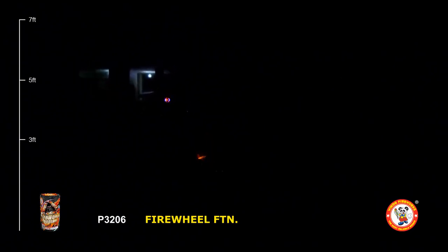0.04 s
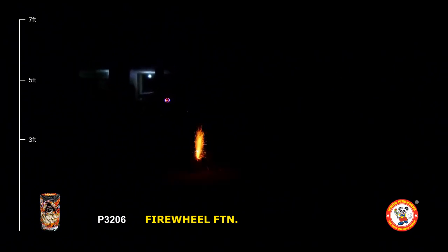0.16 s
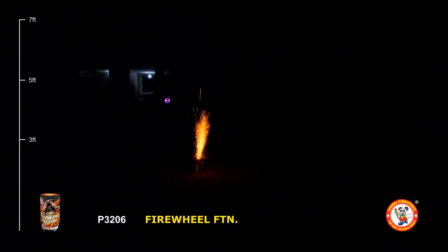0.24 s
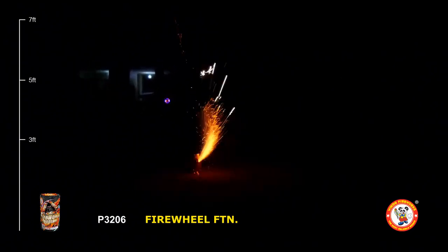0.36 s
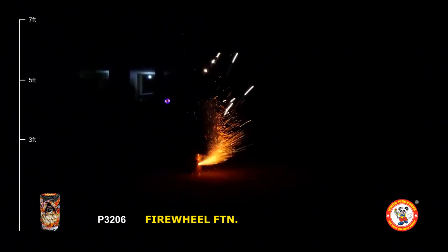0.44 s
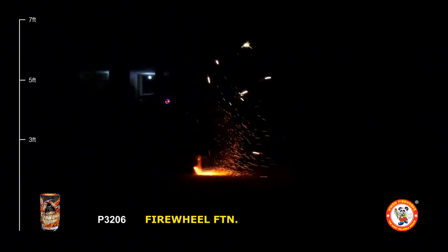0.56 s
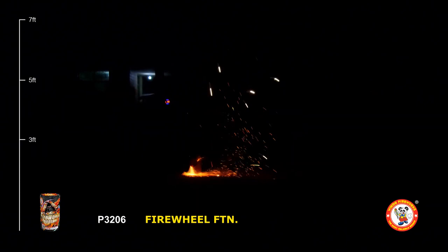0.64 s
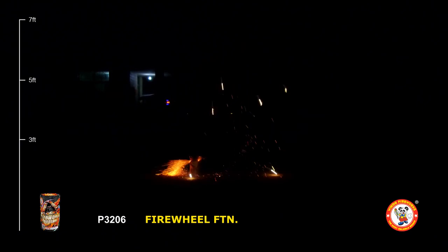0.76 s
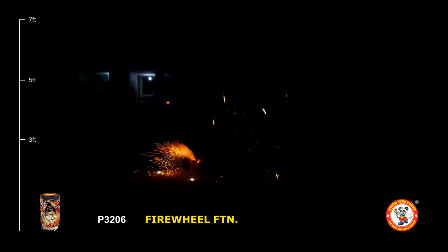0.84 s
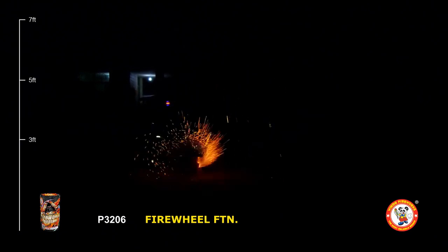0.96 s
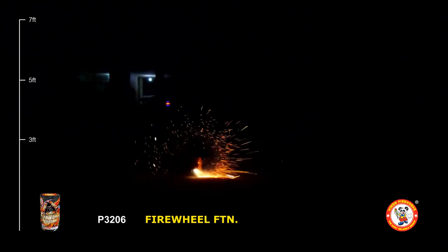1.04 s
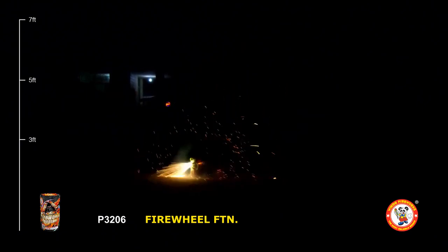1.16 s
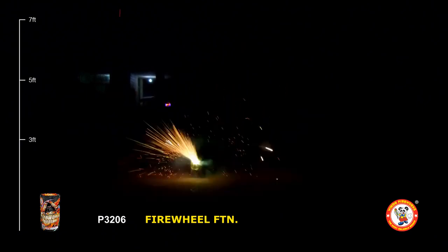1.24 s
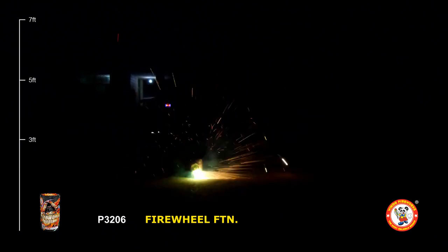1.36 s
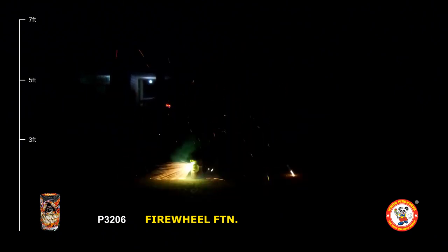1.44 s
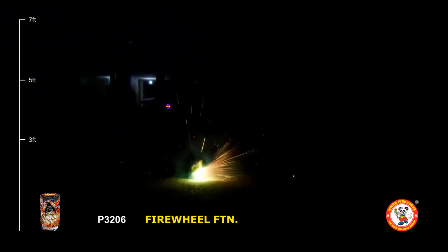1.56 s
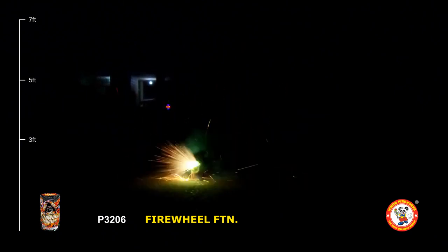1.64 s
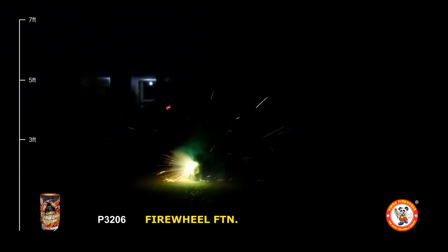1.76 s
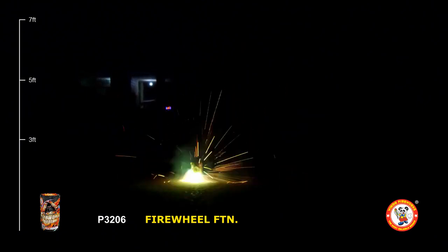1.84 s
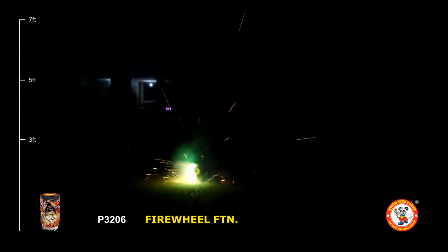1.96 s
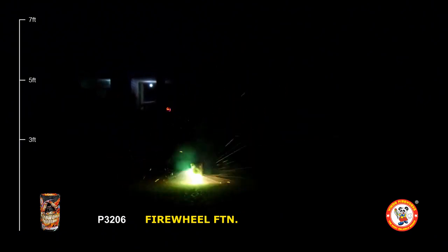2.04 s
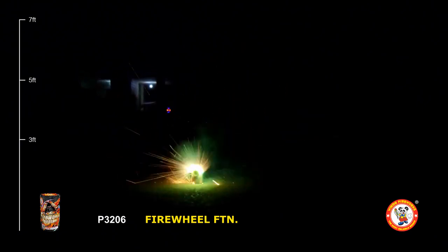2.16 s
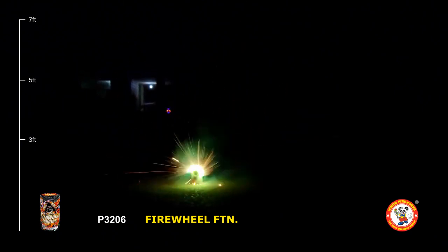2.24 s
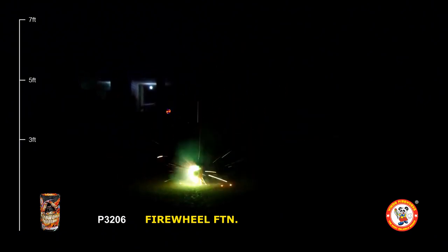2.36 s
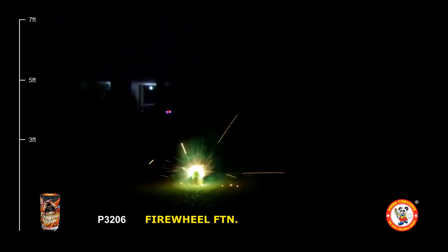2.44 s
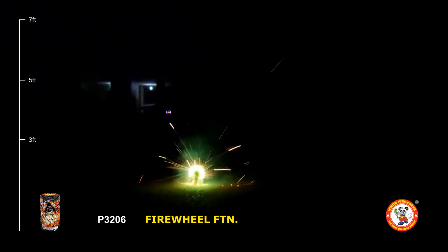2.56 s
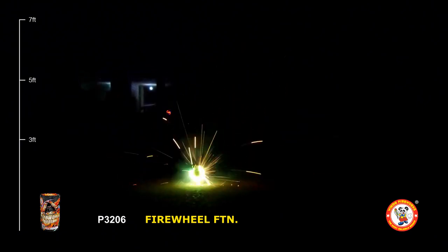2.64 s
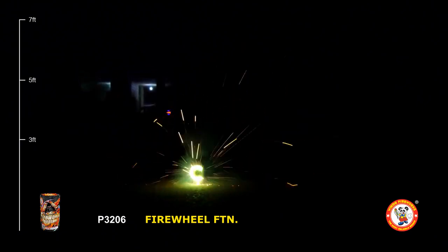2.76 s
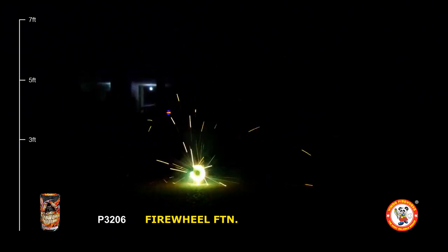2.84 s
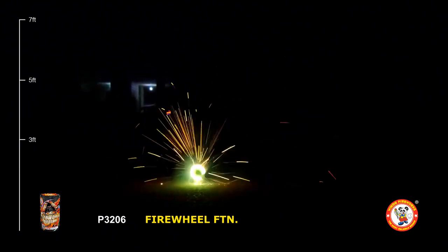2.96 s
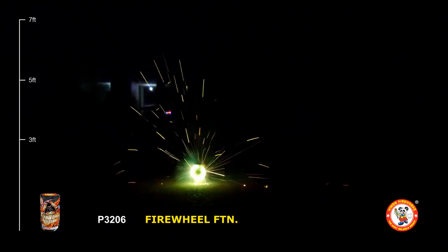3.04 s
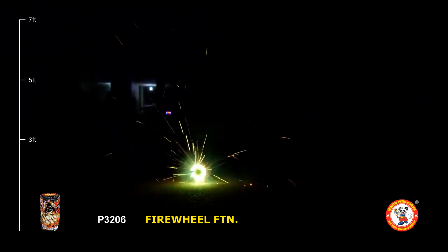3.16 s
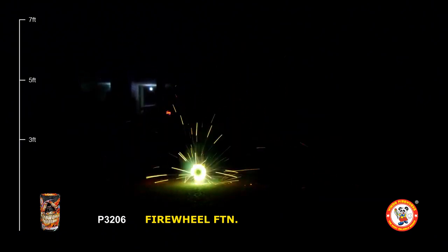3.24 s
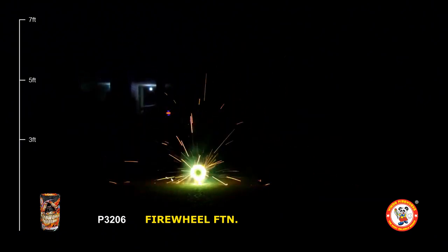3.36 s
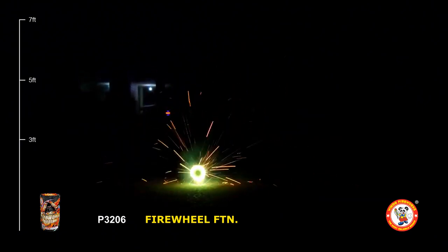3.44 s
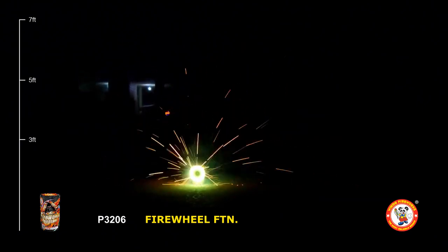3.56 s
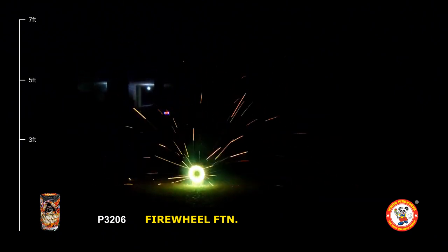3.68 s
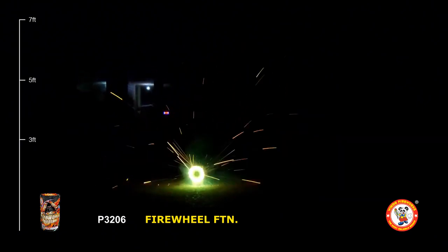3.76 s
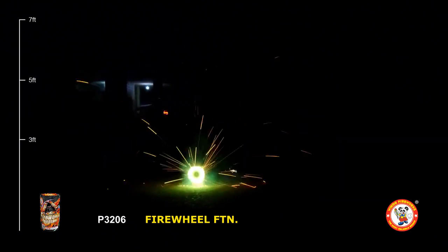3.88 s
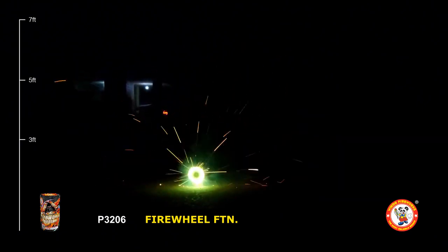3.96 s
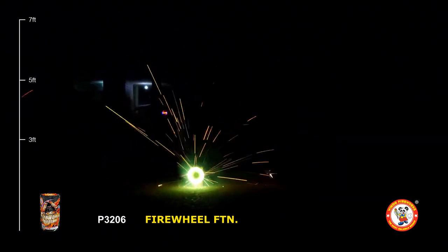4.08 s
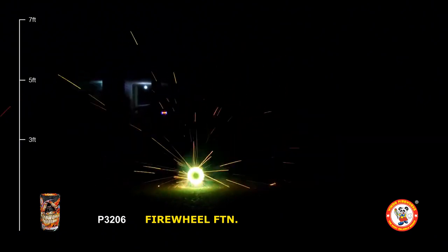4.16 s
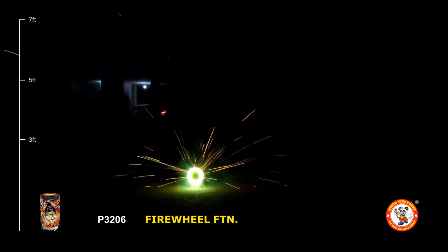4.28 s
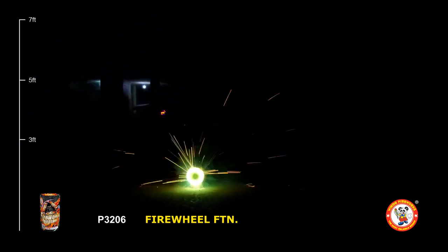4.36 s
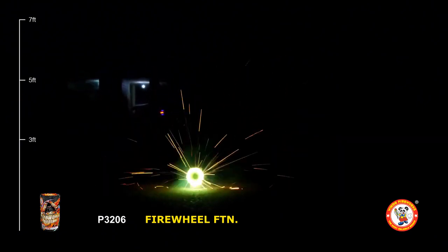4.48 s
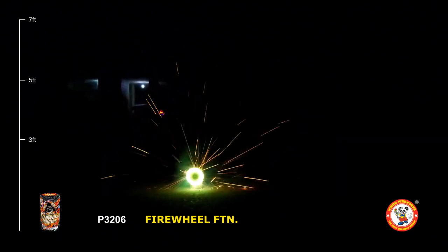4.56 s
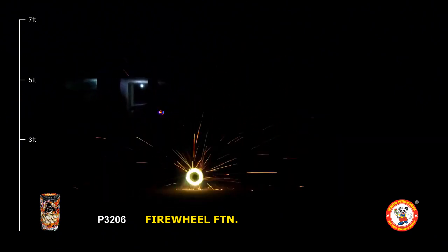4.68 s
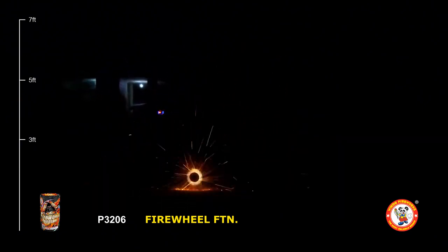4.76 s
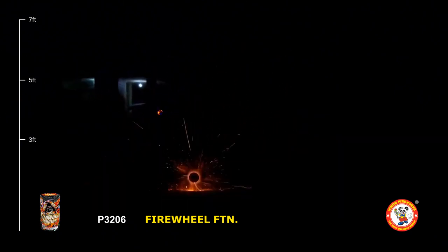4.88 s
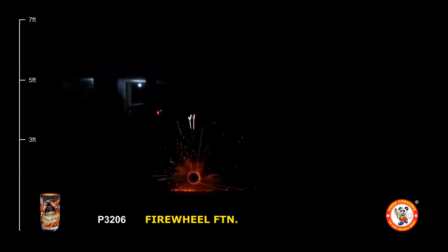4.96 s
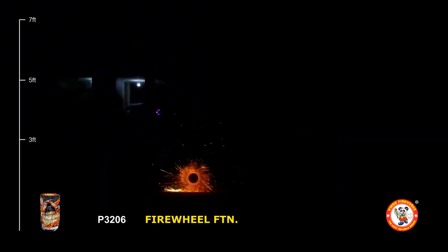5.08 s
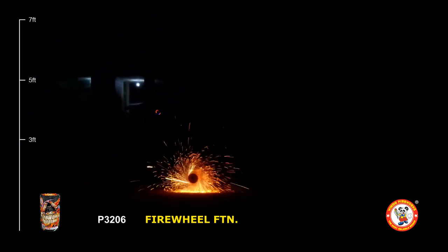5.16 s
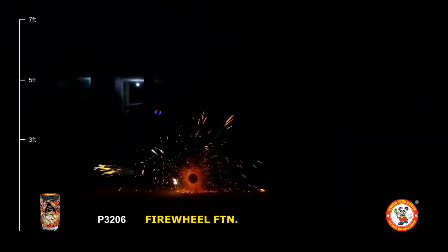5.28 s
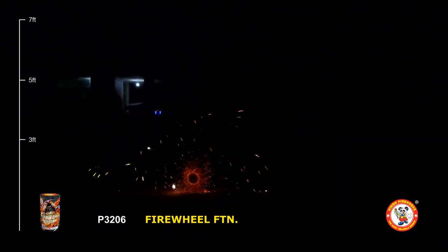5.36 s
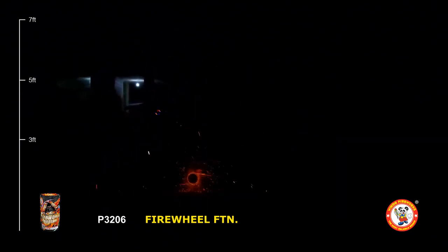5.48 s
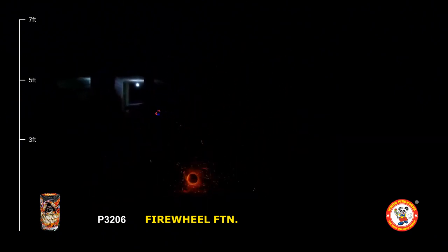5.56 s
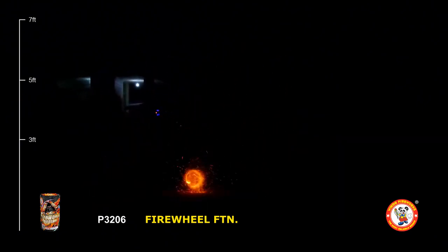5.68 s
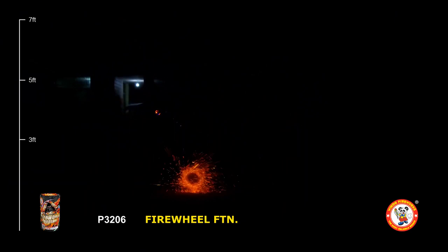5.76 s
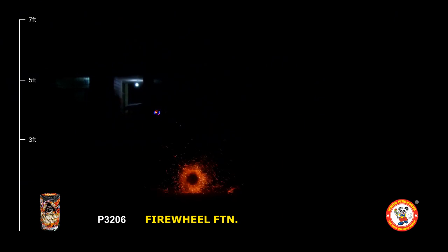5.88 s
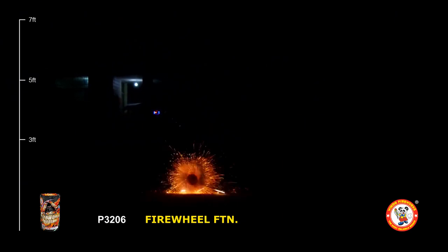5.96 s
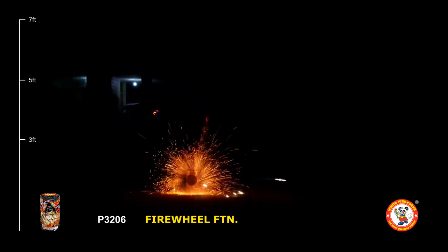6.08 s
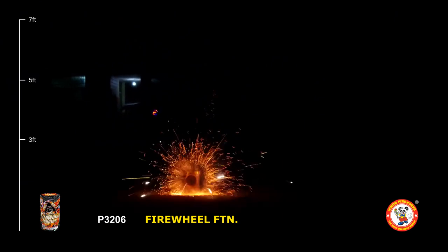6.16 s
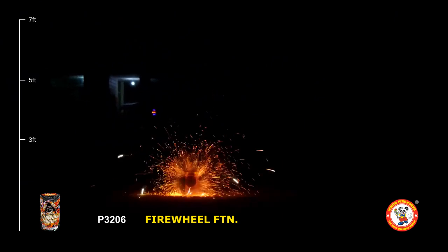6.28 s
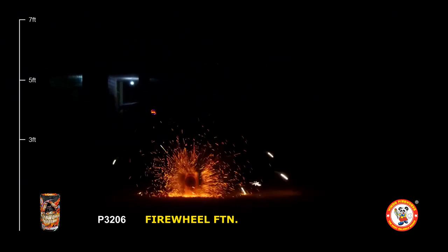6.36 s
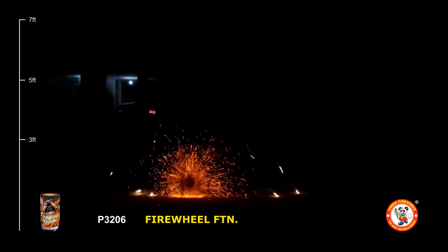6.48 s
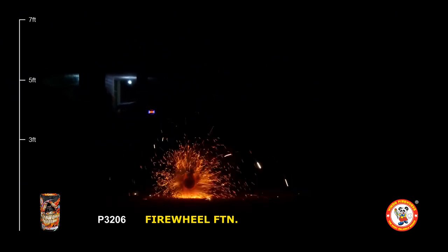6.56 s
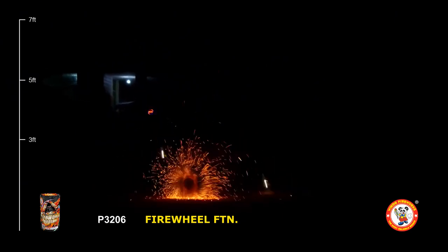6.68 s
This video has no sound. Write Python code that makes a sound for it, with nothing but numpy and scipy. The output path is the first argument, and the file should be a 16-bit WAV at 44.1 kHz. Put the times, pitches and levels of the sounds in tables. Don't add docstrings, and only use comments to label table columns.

```python
import sys
import numpy as np
from scipy import signal
from scipy.fft import rfft, irfft, next_fast_len
from scipy.io import wavfile
from scipy.ndimage import uniform_filter1d, map_coordinates

SR = 44100
rng = np.random.default_rng(int(sys.argv[2]) if len(sys.argv) > 2 else 0)


def generate_wav(sig):
    pcm = np.round(np.clip(np.atleast_2d(sig).T, -1, 1) * 32767).astype(np.int16)
    wavfile.write(sys.argv[1], SR, pcm)


def undo_db(level):
    steps = np.asarray(level, float) / 20
    return 10 ** steps


N = 296484
T = np.arange(N) / SR
HZ = np.fft.rfftfreq(next_fast_len(N), 1 / SR)
CRACK_S = 5.8378


def evened(x):
    return x / np.sqrt(np.mean(x ** 2) + 1e-20)


def read(points, hz):
    f, value = np.transpose(points)
    return np.interp(np.log(hz + 1), np.log(f + 1), value)


def shaped(x, gain):
    size = next_fast_len(N)
    return irfft(rfft(x, size) * gain, size)[..., :N]


def wander(hz):
    return evened(shaped(rng.standard_normal(N), 1 / np.sqrt(1 + (HZ / hz) ** 4)))


def jet():
    # t/s, speed/(turns/s)
    wheel_speed = [(0.3, 0.313), (0.6, 1.734), (1.15, 2.151), (1.6, 3.96), (1.95, 8.573), (2.35, 12.677),
                   (2.85, 18.829), (3.45, 24.042), (4.1, 28.07), (4.7, 30.278), (5.2, 31.076),
                   (5.45, 24.752), (5.75, 22.174), (6.1, 20.158), (6.73, 19.171)]
    # f/Hz, level/(dB per Hz)
    jet_colour = [(35, -87), (60, -20.5), (241, -18.5), (530, -8.5), (701, -11.5), (1060, -9),
                  (1220, -13.5), (2180, -1), (3720, -14.5), (4690, -10.5), (6050, -1), (9620, -4.5),
                  (10800, 0.5), (12400, -6), (15300, -3)]
    start_turn = -0.55
    speed = np.interp(T, *np.transpose(wheel_speed), left=0)
    angle = 2 * np.pi * (start_turn + np.cumsum(speed) / SR)

    beam_db = 0.14 * np.cos(angle + 0.19)
    flame = rng.standard_normal(N) * undo_db(sputter_db() + beam_db)
    strength = np.clip(0.86 - 0.005 * speed + 0.06 * wander(hz=2.1), 0, 0.95)
    heard = shaped(ground(flame, angle, strength), undo_db(read(jet_colour, HZ)) * housing())

    low = 1 / (1 + (HZ / 1300) ** 8)
    high = 1 - 1 / (1 + (HZ / 4600) ** 8)
    roar = evened(shaped(heard, low))
    body = evened(shaped(heard, 1 - low - high))
    hiss = evened(shaped(heard, high))

    top = shaped(hiss, 1 - 1 / (1 + (HZ / 9500) ** 12))
    flutter_db = 1.8 * wander(hz=147)
    burnout_s = 5.184
    lean_db = 6 * np.exp(-abs(T - burnout_s) / 0.33) * (T < burnout_s)
    cold_db = -2 * np.exp(-speed / 3)
    relay_db = 3 * np.exp(-abs(T - CRACK_S) / 0.28) * (T > burnout_s)
    swell_db = -0.07 + 0.9 * np.cos(angle - 0.05)
    hiss = hiss + top * (undo_db(lean_db + cold_db + relay_db + swell_db + flutter_db) - 1)
    body = body * undo_db(0.42 * np.cos(angle - 0.1))
    return (flames() * [hiss, body, roar]).sum(axis=0)


def flames():
    # t/s, thrust/dB, fullness/dB (a rich, slow flame is fuller, a lean, fierce one thinner)
    driver = [(0.2, -70, 5), (0.36, -42, -3), (0.8, -42, 1.5), (0.95, -47, 1), (1.1, -45, 1),
              (1.45, -35, -2), (1.75, -29.5, -5), (1.9, -29.5, -3.5), (2.05, -32.5, 0.5),
              (2.5, -29.5, -2.5), (3.0, -33, 1.5), (3.4, -30.5, -0.5), (3.8, -32.5, 2.5),
              (4.2, -31.5, -0.5), (4.7, -32, 2.5), (4.9, -34, -2), (5.181, -39.5, -2.5), (5.187, -70, 14)]
    # t/s, thrust/dB, fullness/dB
    embers = [
        (5.179, -60, 14),
        (5.26, -51.5, 13),
        (5.35, -53.5, 8.4),
        (5.48, -63.5, 6.3),
        (5.7, -69, 6),
    ]
    # t/s, thrust/dB, fullness/dB
    relay = [
        (5.651, -65, 3),
        (5.83, -56, 3),
        (5.837, -47.5, 2.5),
        (5.89, -54, -3),
        (6.075, -52.5, -6),
        (6.11, -47, -2),
        (6.16, -42.5, 0.5),
        (6.35, -45, 1.5),
        (6.73, -52.5, 5.5),
    ]
    gains = np.zeros((3, N))
    for rows in (driver, embers, relay):
        s, thrust_db, full_db = np.transpose(rows)
        thrust_db = np.interp(T, s, thrust_db, left=-120, right=-120)
        full_db = np.interp(T, s, full_db)
        body_db = -9.5 + 0.8 * full_db
        roar_db = -17 + 0.64 * full_db - 0.37 * np.maximum(thrust_db + 31, -30)
        gains += undo_db(thrust_db + np.array([0 * T, body_db, roar_db]))
    return gains


def sputter_db():
    # t/s, depth/dB, recovery/s
    chokes = [
        (1.939, 8, 0.0089),
        (3.552, 13, 0.011),
        (3.81, 5, 0.003),
        (3.993, -9, 0.0034),
        (5.837, -4, 0.0022),
        (5.845, 0, 0.0026),
        (6.168, 19, 0.0015),
    ]
    db = 0.55 * wander(hz=290) + 1.05 * wander(hz=37.2) + 0.13 * wander(hz=22.8)
    sparks_per_s, spark_decay_s = 90, 0.0008
    cracks = (rng.random(N) < sparks_per_s / SR) * np.minimum(rng.exponential(1, N), 1.8)
    ringing = signal.lfilter([1], [1, -np.exp(-1 / (spark_decay_s * SR))], cracks)
    db = db + 2.6 * np.minimum(ringing, 1.8)
    for s, depth_db, recovery_s in chokes:
        since = np.clip((T - s) / recovery_s, 0, 9)
        db = db - depth_db * (T > s) * np.exp(-since ** 2)
    return db


def ground(x, angle, strength):
    low_ms, high_ms = 0.072, 0.18
    lag_ms = low_ms + (high_ms - low_ms) * (1 - np.cos(angle)) / 2
    shade = 1 - 0.75 * np.exp(-((HZ - 4300) / 1100) ** 2)
    dull = shaped(x, shade / (1 + (HZ / 13500) ** 3))
    late = np.arange(N) - lag_ms * SR / 1000
    return x + strength * map_coordinates(dull, [late], order=3, mode="nearest")


def housing():
    # f/Hz, width/Hz, depth/dB
    notches = [(700, 60, 8), (1235, 60, 14), (3750, 400, 4), (4710, 130, 15), (5140, 130, 12),
               (5400, 500, 4), (5680, 150, 11), (5930, 250, -4), (7660, 200, 7), (8750, 300, 5),
               (9450, 300, 5), (9950, 500, 5), (12350, 200, 9), (13650, 500, 4), (14400, 1300, -8)]
    return undo_db(-sum(db / (1 + (2 * (HZ - hz) / width) ** 2) for hz, width, db in notches))


def slag():
    # t/s, peak/dB, f/Hz
    spits = [(0.386, -24.5, 644), (1.779, -24, 530), (2.025, -22.5, 497), (2.205, -25, 483),
             (2.304, -22.5, 520), (2.372, -26, 460), (2.791, -26, 510), (4.006, -32, 507),
             (4.337, -25, 563), (4.598, -26, 590), (5.975, -40, 170), (6.113, -30.5, 490), (6.17, -26, 730),
             (6.198, -27, 650), (6.373, -33, 600)]
    # t/s, peak/dB, f/Hz
    pops = [
        (2.027, -35, 118),
        (4.978, -28.5, 393),
        (5.1805, -33, 513),
        (5.8362, -37, 126),
        (5.846, -39.5, 338),
        (5.855, -37.5, 470),
    ]
    out = np.zeros(N + 2000)
    t = np.arange(2000) / SR
    for sign, rows in ((-0.47, spits), (0.69, pops)):
        for s, peak_db, hz in rows:
            swing = np.sin(2 * np.pi * hz * t) * np.exp(-(1.17 * hz * t) ** 2)
            out[round(s * SR):][:2000] += sign * undo_db(peak_db) * swing
    crack_db, crack_ms, rise_s = -29, 0.84, 0.00033
    u = t * 1000 / crack_ms
    crack = (1 - u) * np.exp(-u) * np.minimum(t / rise_s, 1)
    out[round(CRACK_S * SR):][:2000] += undo_db(crack_db) * crack
    return out[:N]


def yard(x):
    # f/Hz, t60/s
    decay = [(200, 0.43), (2000, 0.16), (8000, 0.12)]
    # f/Hz, level/dB
    yard_tone = [(100, -19.5), (700, -15), (1500, -23), (3000, -16), (6000, -11), (14000, -8)]
    # f/Hz, side over mid/dB
    spread = [(60, -15), (130, -22), (290, -20.5), (640, -21), (1410, -24), (3100, -29), (6820, -18),
              (15000, -23)]
    hz, t, z = signal.stft(rng.standard_normal((2, SR // 2)), SR, nperseg=256)
    fade_db = -60 * t / read(decay, hz)[:, None]
    tail = signal.istft(z * undo_db(fade_db), SR, nperseg=256)[1]
    tail = np.pad(tail / np.linalg.norm(tail[0]), ((0, 0), (300, 0)))
    mid, side = signal.fftconvolve(x[None], tail, axes=1)[:, :N]
    side = shaped(side, undo_db(read(spread, HZ) + 0.5))
    return shaped(mid, undo_db(read(yard_tone, HZ))) + np.array([side, -side])


def night():
    # f/Hz, level/(dB per Hz)
    night_colour = [(20, -16), (50, -7), (150, -8), (300, -12), (600, -22.5), (1300, -30), (1800, -20),
                    (2080, -16.5), (2350, -17), (3500, -33), (5500, -28.5), (6000, -23.5), (12000, -23.5),
                    (15000, -33)]
    murmur = shaped(rng.standard_normal(N), undo_db(read(night_colour, HZ)) * housing())
    level_db = -63 + 2.5 * wander(hz=2.2)
    return undo_db(level_db) * murmur / np.std(shaped(murmur, HZ < 1800))


def scene():
    wheel = jet() + slag()
    return wheel + yard(wheel) + night()


def starved(mid, side):
    hz, t, (mid, side) = signal.stft(np.array([mid, side]), SR, nperseg=2048, noverlap=1536)
    coarse = rng.standard_normal((2, len(hz) // 6 + 1, len(t) // 6 + 1))
    blocks = np.repeat(np.repeat(coarse, 6, axis=1), 6, axis=2)
    wobble, patch = blocks[:, :len(hz), :len(t)]
    power = uniform_filter1d(abs(mid) ** 2, size=5, axis=1)
    level = power[(hz > 1500) & (hz < 9500)].mean(axis=0)
    quiet_db = 10 * np.log10(level.max() / level)
    limit_db = -11.5 - 0.04 * quiet_db + 1.5 * (hz > 7000)[:, None] + 4 * wobble
    weak = power < level * undo_db(2 * limit_db)
    mid = mid * ~(weak & (hz > 2600)[:, None])
    patch = evened(uniform_filter1d(patch, size=40, axis=0))
    patchy = 2.2 * (patch > 0.9) * (hz[:, None] < 14300)
    side = side * np.where(hz[:, None] < 1200, 1, patchy)
    return signal.istft(np.array([mid, side]), SR, nperseg=2048, noverlap=1536)[1][:, :N]


def low_pass(x):
    return signal.sosfilt(signal.butter(12, 15720, fs=SR, output="sos"), x)


def record(dry):
    mid, side = (dry[0] + dry[1]) / 2, (dry[0] - dry[1]) / 2
    power_db = 10 * np.log10(abs(uniform_filter1d(mid ** 2, 4000)) + 1e-12)
    side = side * np.clip((power_db + 41) / 6, 0, 1)
    mid, side = starved(mid, side)
    edge = 1 / (1 + (HZ / 15270) ** 300) + undo_db(-40) * (HZ < 15720)
    return low_pass(shaped(np.array([mid + side, mid - side]), edge))


dry = scene()
out = record(dry)
generate_wav(out)
```